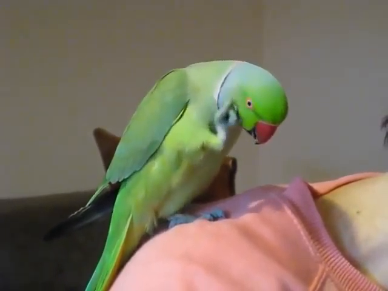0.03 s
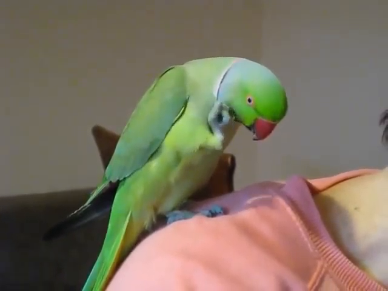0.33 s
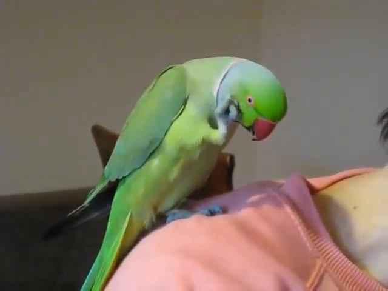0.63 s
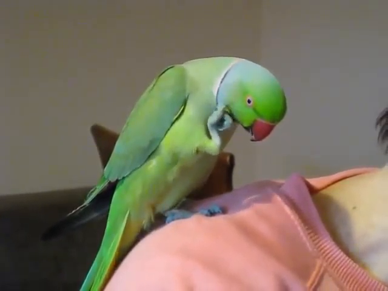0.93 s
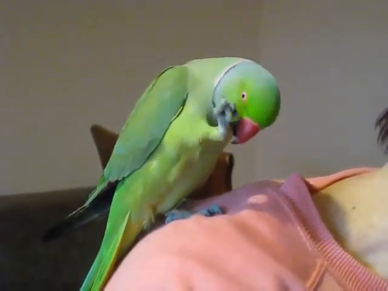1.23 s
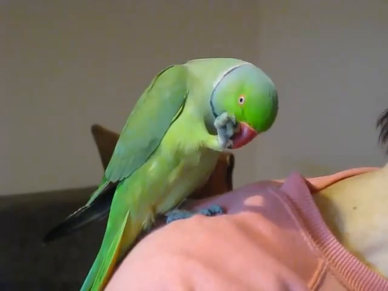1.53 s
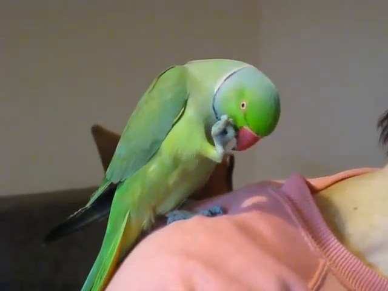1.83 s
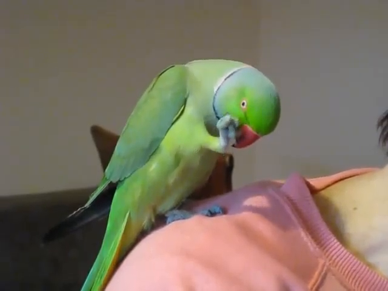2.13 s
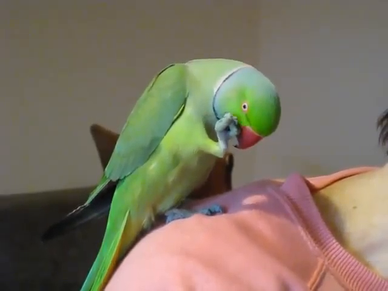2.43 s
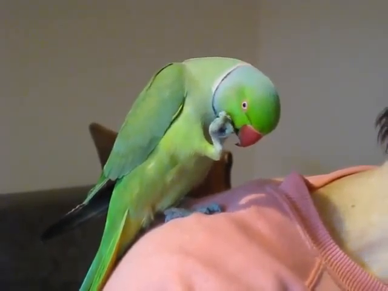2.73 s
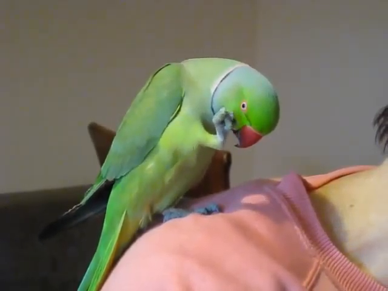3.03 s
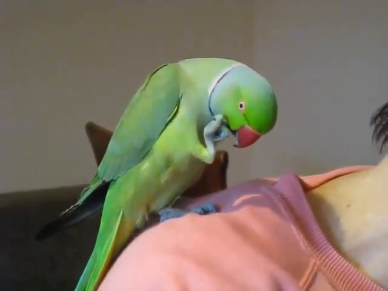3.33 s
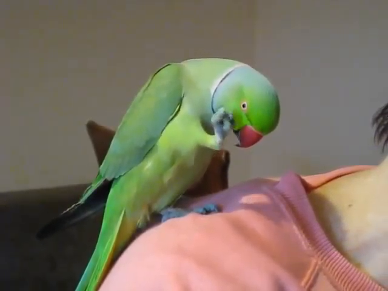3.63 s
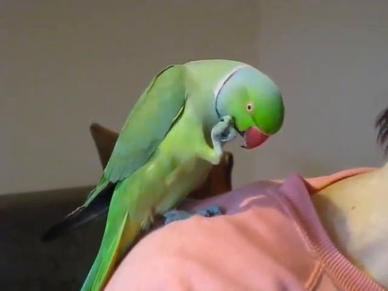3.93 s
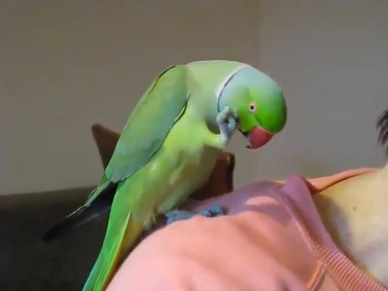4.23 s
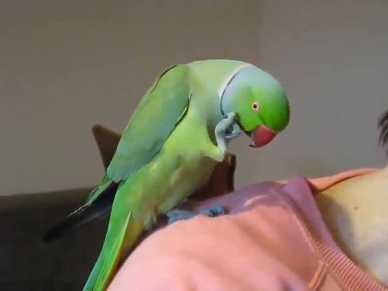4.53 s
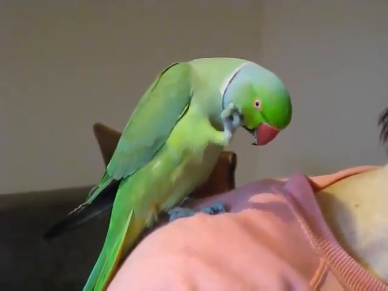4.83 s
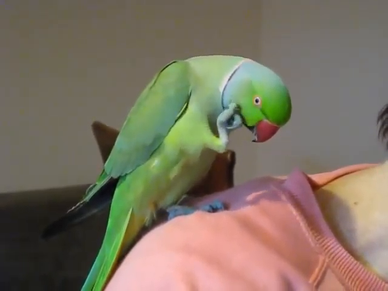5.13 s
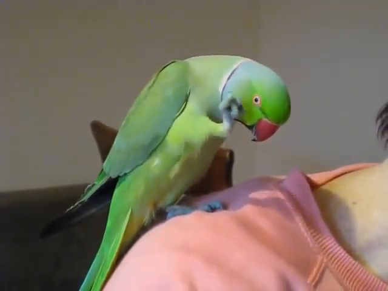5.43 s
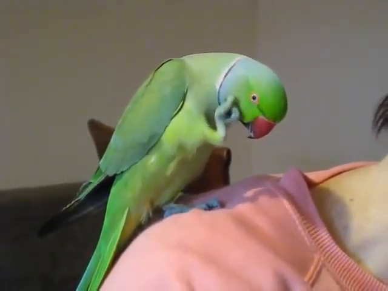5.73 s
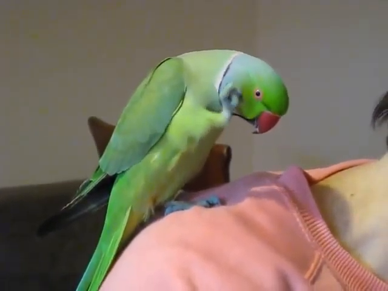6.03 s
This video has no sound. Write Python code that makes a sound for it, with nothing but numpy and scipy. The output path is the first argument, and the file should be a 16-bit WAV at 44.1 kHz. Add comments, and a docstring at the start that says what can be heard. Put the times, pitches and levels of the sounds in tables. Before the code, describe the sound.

A pet parakeet sits close to the microphone in a small living room. At first there are only a few tiny ticks of beak and claw over steady hiss and faint electrical hum. Then the bird starts a quick, even run of sharp clicking clucks, about five a second, beginning as soft pops and growing louder. Each rings briefly in the room. The run stops shortly before the end, leaving two faint ticks.

```python
"""A small living room, with a parakeet perched on a shoulder close to the microphone.
It clucks nineteen times, about five a second, growing louder; its beak and claw tick softly.
Each cluck is two tiny bursts of voice pulses through throat and beak; every pulse ends in a bright snap.
The room rings after each one, over a bed of hiss and faint electrical hum."""
import sys
import numpy as np
from scipy import signal
from scipy.fft import rfft, irfft
from scipy.io import wavfile

SR = 44100
rng = np.random.default_rng(int(sys.argv[2]) if len(sys.argv) > 2 else 0)


def to_wav(sig):
    """Store sig (one row per channel, or 1-D mono) as 16-bit WAV at the path in sys.argv[1].

    Samples outside -1..1 are clipped; the rate is SR.
    """
    pcm = np.clip(np.atleast_2d(sig), -1, 1) * 32767
    pcm = np.round(pcm).astype(np.int16)
    wavfile.write(sys.argv[1], SR, pcm.T)  # frames by channels


N = 267731
TAPS = 4096  # samples in one cluck or tick
BINS = np.fft.rfftfreq(TAPS, 1 / SR)

# colour of the background hiss: (frequency [Hz], relative level [dB])
HISS_COLOUR = [(20, -7), (45, -3), (100, 0.5), (200, 1.5), (400, -1.5), (750, -2.5), (1200, -5.5),
               (3000, -9), (6000, -13.5), (9000, -17), (11500, -15.5), (17000, -23)]
# hum and whine of household appliances: (frequency [Hz], rms level [dB])
APPLIANCE_TONES = [(199.6, -55.5), (249.5, -65.5), (300, -68), (1249, -66.5), (1700, -62.5), (1997, -73),
                   (2649, -68.5), (3004, -96), (14578, -82), (15735, -72)]
# first echoes from nearby surfaces: (delay [s], level [dB])
EARLY_ECHOES = [(.0056, -14.5), (.0144, -19), (.0186, -31.5)]
# decay of the room's tail: (frequency [Hz], time to fall 60 dB [s])
TAIL_DECAY = [(500, 0.27), (1500, 0.34), (2700, 0.32), (5000, .32), (12000, 0.28)]
# colour of the room's tail: (frequency [Hz], level against the direct sound [dB])
TAIL_COLOUR = [(300, -2), (650, -5.5), (1000, 2), (1500, 0), (2300, -7.5), (3100, 0.5), (4000, -9.5),
               (6000, -11.5), (6600, -7), (7200, -6), (9500, -12.5), (15000, -7.5)]
# ticks of beak and claw: (time [s], peak level [dB], centre [Hz])
BEAK_CLAW_TICKS = [(0.3193, -44, 11500), (0.6156, -34, 4100), (1.454, -41, 2200), (2.1, -31, 1500),
                   (2.141, -37, 1000), (5.7382, -44, 10500), (5.9273, -44, 13500)]
# colour of the snap after each voice pulse: (frequency [Hz], relative level [dB])
SNAP_COLOUR = [(300, -17.5), (1500, -4.5), (3100, -2.5), (3500, 4), (4050, 0.5), (4550, 6), (5250, -12.5),
               (6000, 2.5), (7200, -2.5), (9400, 5), (11200, -1), (12600, -10), (13700, -7), (14600, -11),
               (15400, -18), (17000, -31)]
# resonances of the throat that stay put: (frequency [Hz], width [Hz], level [dB])
THROAT_RESONANCES = [(600, 190, -4), (765, 150, -4), (1320, 330, -2), (1780, 450, -3), (2190, 200, 2)]
# one row a cluck: (time of the first burst's last pulse [s], level [dB], pulse rate [Hz],
# mouth resonance [Hz], second burst against the first [dB], upper resonances' lift as the beak opens [dB])
CLUCK_RUN = [(1.6318, -45.5, 670, 1830, 5, 6), (1.813, -26, 492, 1880, 0.5, 1.5),
             (2.0132, -25.5, 550, 1650, 3.5, -5), (2.213, -26.5, 620, 1320, 9, -6.5),
             (2.4147, -26, 637, 1520, 2, -4), (2.6175, -20.5, 640, 1770, 7, 2),
             (2.8197, -16.5, 693, 1800, 2, 6.5), (3.0304, -16.5, 708, 1900, -2.5, 0.5),
             (3.242, -18, 661, 1590, -3.5, -0.5), (3.4549, -16.5, 765.5, 1780, 6, 3),
             (3.67, -16, 639, 1730, -4, 2), (3.8842, -16, 687, 1730, 0, 2.5),
             (4.109, -15.5, 776.4, 1940, -5.5, 5.5), (4.3283, -14.5, 746, 1860, 1, 1.5),
             (4.5535, -15, 813, 1890, -1, 8.5), (4.7726, -15.5, 732.5, 1910, 0.5, 2.5),
             (5.0092, -15, 685, 1820, -1.5, 6), (5.2367, -16.5, 798, 1980, 0.5, 3.5),
             (5.4676, -16, 654, 1780, -5.5, 2.5)]


def gain_of(db):
    """Decibels to amplitude."""
    return 10 ** (np.asarray(db) / 20)


def unit(x):
    """Scales to an energy of one."""
    return x / np.sqrt(np.sum(x ** 2) + 1e-20)


def curve_at(points, hz):
    """Joins (Hz, value) points on a log-frequency axis."""
    point_hz, value = np.transpose(points)
    return np.interp(np.log(hz + 1), np.log(point_hz), value)


def add(mix, s, sound):
    """Mixes a sound in at s seconds."""
    part = mix[round(s * SR):][:len(sound)]
    part += sound[:len(part)]


def ring(x, gain):
    """Passes a short sound through a causal filter with this gain at each of the BINS."""
    log_gain = np.log(np.maximum(gain, 1e-5))
    mirrored = np.concatenate([log_gain, log_gain[-2:0:-1]])
    minimum_phase = np.exp(np.conj(signal.hilbert(mirrored)))[:len(BINS)]
    return irfft(rfft(x, TAPS) * minimum_phase)


def hiss(rms_db=-50):
    """An even bed of noise, strongest in the bass."""
    colour = gain_of(curve_at(HISS_COLOUR, np.fft.rfftfreq(N, 1 / SR)))
    noise = irfft(rfft(rng.standard_normal(N)) * colour, N)
    return gain_of(rms_db) * np.sqrt(N) * unit(noise)


def appliance_hum(waver=0.12):
    """Faint electrical tones, each wavering slightly in level and phase."""
    out, t = np.zeros(N), np.arange(N) / SR
    knots = np.linspace(0, t[-1], 30)
    for hz, db in APPLIANCE_TONES:
        swell, drift = (np.interp(t, knots, v) for v in waver * rng.standard_normal((2, len(knots))))
        tone = np.sin(2 * np.pi * (hz * t + rng.random()) + drift)
        out += np.sqrt(2) * gain_of(db) * (1 + swell) * tone
    return out


def echoes(x, dull_hz=3500):
    """Single reflections off nearby surfaces; soft furnishings take away their treble."""
    out = np.zeros(N)
    dull = signal.lfilter(*signal.butter(2, dull_hz, fs=SR), x)
    for delay, db in EARLY_ECHOES:
        add(out, delay, gain_of(db) * dull)
    return out


def room_tail(first_s=0.0022):
    """Dense reflections of random sign, one in every eight samples, each band dying at its own speed."""
    reflections = np.zeros(SR // 2)
    slots = np.arange(0, len(reflections) - 8, 8)
    signs = rng.choice([-1, 1], len(slots)) * (slots > first_s * SR)
    reflections[slots + rng.integers(0, 8, len(slots))] = signs
    hz, t, bands = signal.stft(unit(reflections), SR, nperseg=128)
    t60 = curve_at(TAIL_DECAY, hz)[:, None]
    decay = np.exp(-np.log(1000) * t / t60) * np.sqrt(np.log(1000) / t60)
    colour = gain_of(curve_at(TAIL_COLOUR, hz))[:, None]
    return signal.istft(bands * decay * colour, SR, nperseg=128)[1]


def room(x, turn_rad_per_s=2.505):
    """First echoes, and three tails that crossfade as the bird moves its head."""
    angle = turn_rad_per_s * np.arange(N) / SR
    shares = [np.cos(angle + k * np.pi / 3) * np.sqrt(2 / 3) for k in range(3)]
    return echoes(x) + sum(signal.fftconvolve(x * share, room_tail())[:N] for share in shares)


def ticks(fade_s=0.0026, half_width_octaves=0.52):
    """Tiny dry ticks close to the microphone as the bird nibbles and scratches."""
    out, t = np.zeros(N), np.arange(TAPS) / SR
    for s, db, hz in BEAK_CLAW_TICKS:
        colour = 1 / (1 + (np.log2((BINS + 1) / hz) / half_width_octaves) ** 2)
        tick = ring(rng.standard_normal(TAPS) * np.exp(-t / fade_s), colour)
        add(out, s, gain_of(db) * tick / abs(tick).max())
    return out


def snap(pulse_times, sizes, lag_s=0.0005, fade_s=0.0006, linger=0.16, linger_s=0.0012):
    """Just after each pulse comes a bright puff of noise that dies within a millisecond or two."""
    age = np.arange(TAPS) / SR - pulse_times[:, None] - lag_s
    fades = (age >= 0) * (np.exp(-abs(age) / fade_s) + linger * np.exp(-abs(age) / linger_s))
    puffs = sizes @ fades * rng.standard_normal(TAPS)
    return ring(puffs, gain_of(curve_at(SNAP_COLOUR, BINS)))


def vocal_tract(level_db, mouth_hz, open_db, full_effort_db=-15, low_hz=950, upper_hz=2000, top_hz=2960):
    """Gain of throat, mouth and beak: soft clucks are hollow, an open beak lifts the upper resonances."""
    soft_db = max(full_effort_db - level_db, 0)
    # the low resonances gain in soft clucks, and lose 3 dB for each octave the mouth resonance rises
    low_db = 0.49 * soft_db - 3 * np.log2(mouth_hz / 1667)
    # the beak resonance rises in soft clucks, and as the beak opens
    beak_hz = 2460 + 510 * (1 - gain_of(-soft_db)) + 25 * open_db
    power = 0
    for hz, width, db in list(THROAT_RESONANCES) + [(mouth_hz, 240, 3.0), (beak_hz, 330, -2.0)]:
        db = db + low_db * (hz < low_hz) + open_db / (1 + (upper_hz / hz) ** 10)
        power = power + gain_of(db) ** 2 / (1 + (2 * (BINS - hz) / width) ** 2) ** 1.2
    radiated = BINS ** 6 / np.hypot(BINS ** 6, 490 ** 6)  # so small a mouth gives off no bass
    treble_fall = 1 / np.hypot(1, (BINS / top_hz) ** 10)
    return np.sqrt(power) * radiated * treble_fall


def burst(pulse_hz, swell_s, count, jitter=0.083):
    """A few pulses that swell up to the last: their seconds before the last, and their sizes."""
    early = np.arange(count) / pulse_hz * (1 + jitter * rng.standard_normal(count))
    return early, 1 / (1 + (early / swell_s) ** 4)


def voice_pulses(pulse_times, sizes, spread_s=0.0003, middle_hz=1700):
    """Each pulse starts round and sharpens as it closes, so its treble comes a moment after its bass."""
    lag_s = spread_s * np.tanh(BINS / middle_hz - 1)
    sharpening = np.exp(-2j * np.pi * np.cumsum(lag_s) * BINS[1])
    spectrum = sizes @ np.exp(-2j * np.pi * pulse_times[:, None] * BINS)
    return irfft(sharpening * spectrum)


def cluck(lead_s, is_pop, level_db, pulse_hz, mouth_hz, second_db, open_db,
          opening_db=-22, bright_s=0.049, level_span_s=0.016):
    """A faint opening tick, then two bursts ring the throat; the last pulse of each snaps brightest."""
    gap_s = (1.02 if is_pop else 3.03) / pulse_hz  # bursts one period apart merge into a single pop
    swell_s = 0.00204 * (pulse_hz / 717) ** 2.47  # the first burst swells for longer as the pitch rises
    first_early, first_sizes = burst(pulse_hz, swell_s, count=4)
    second_early, second_sizes = burst(pulse_hz, 0.39 * gap_s, count=3)
    opening_early = min(swell_s * 1.52 + 0.00109, lead_s)
    pulse_times = lead_s + np.concatenate([[-opening_early], -first_early, gap_s - second_early])
    sizes = np.concatenate([[gain_of(opening_db)], first_sizes, gain_of(second_db) * second_sizes])
    voice = ring(voice_pulses(pulse_times, sizes), vocal_tract(level_db, mouth_hz, open_db))
    brightness = np.exp(-np.concatenate([[0], first_early, second_early]) / bright_s)
    snaps = snap(pulse_times, sizes * brightness)
    snap_db = -9.5 + 0.5 * is_pop - 0.17 * open_db  # against the voice: weaker as the beak opens
    return gain_of(level_db) * np.sqrt(level_span_s * SR) * (unit(voice) + gain_of(snap_db) * unit(snaps))


def parakeet(warm_up_s=2.3, lead_s=0.008):
    """The run of clucks at close range: short pops while the bird warms up, then longer and louder."""
    out = np.zeros(N)
    for s, *shape in CLUCK_RUN:
        add(out, s - lead_s, cluck(lead_s, s < warm_up_s, *shape))
    return out


def scene():
    """The bird up close, the room around it, hiss and hum behind; one channel."""
    bird = parakeet() + ticks()
    return (bird + room(bird) + hiss() + appliance_hum())[None]


def record(dry, notch_hz=7900, notch_half_width_hz=520, notch_depth=0.98, edge_hz=17100):
    """The microphone has a deep notch in the treble; a steep band limit follows."""
    hz = np.fft.rfftfreq(N, 1 / SR)
    notch = 1 - notch_depth / (1 + ((hz - notch_hz) / notch_half_width_hz) ** 2)
    coloured = irfft(rfft(dry) * notch, N)
    band_limit = signal.firwin(511, edge_hz, window=("kaiser", 9), fs=SR)
    return signal.oaconvolve(coloured, band_limit[None], "same")


dry = scene()
out = record(dry)
to_wav(out)
```